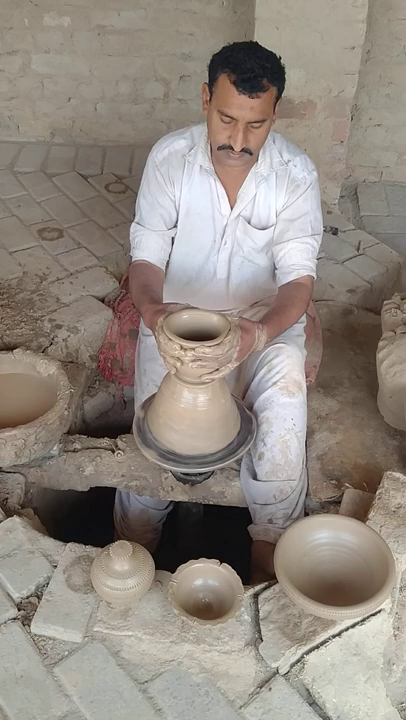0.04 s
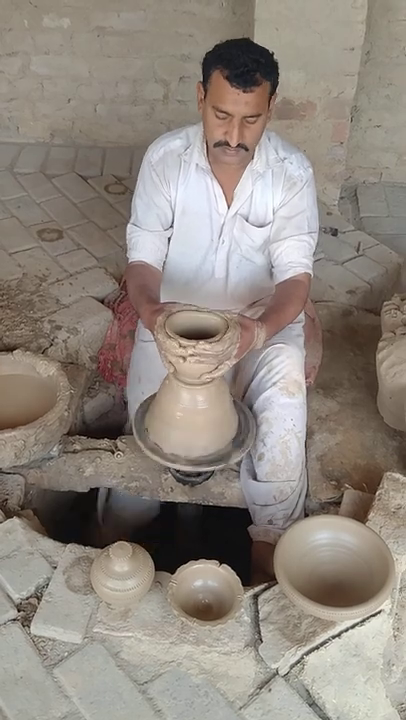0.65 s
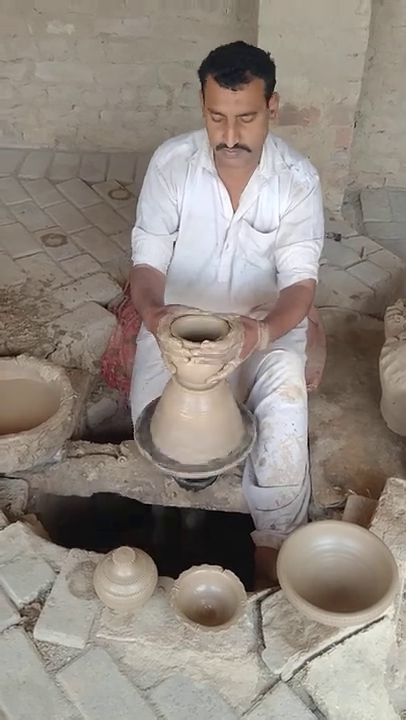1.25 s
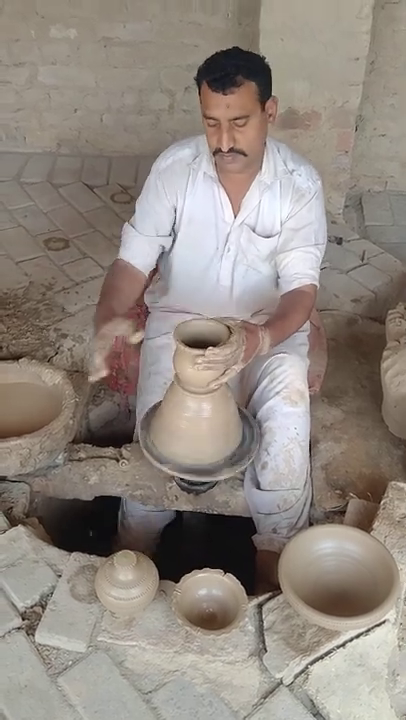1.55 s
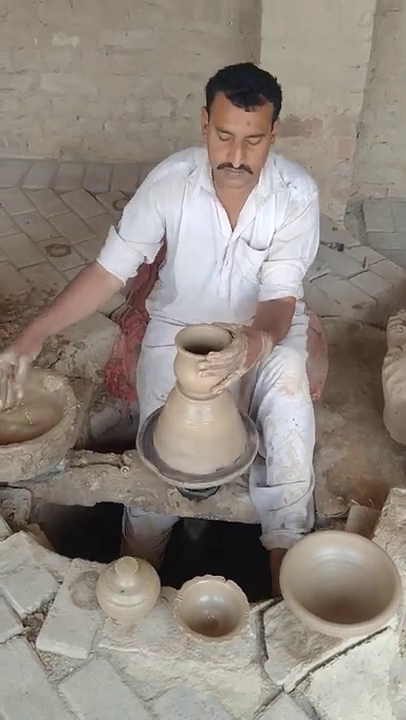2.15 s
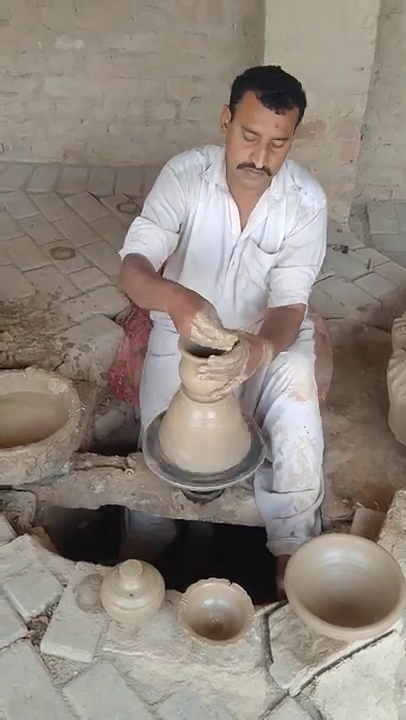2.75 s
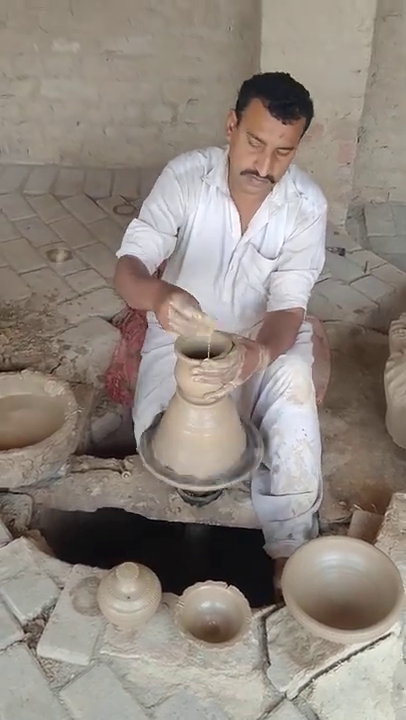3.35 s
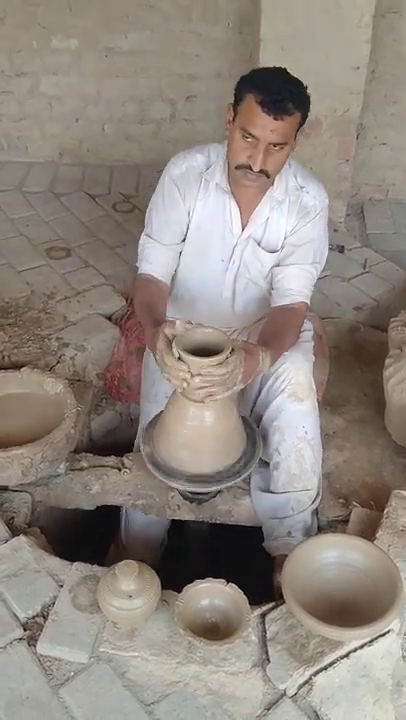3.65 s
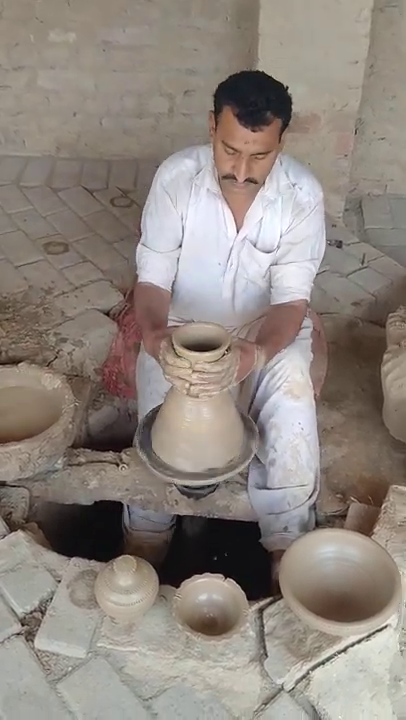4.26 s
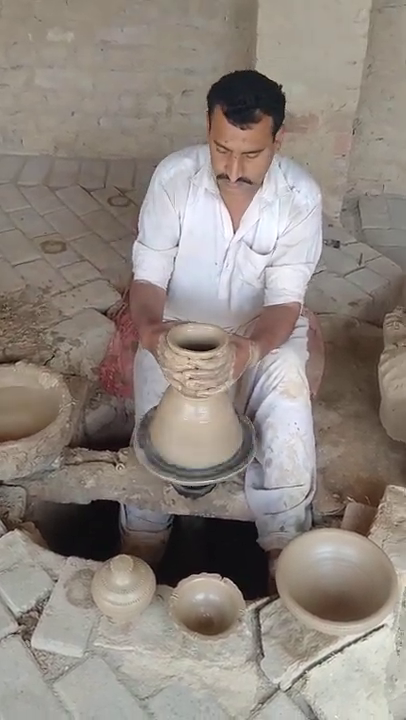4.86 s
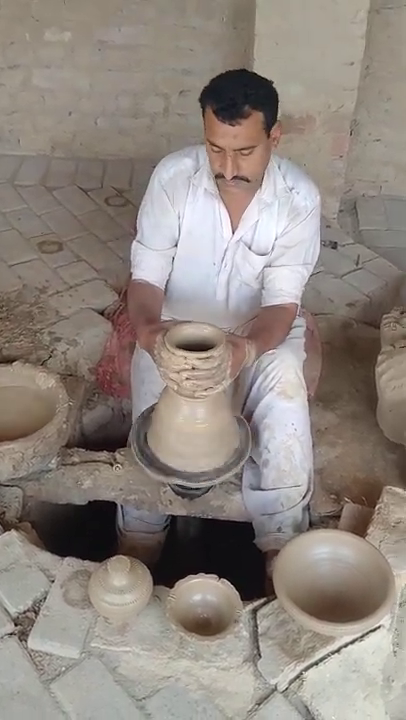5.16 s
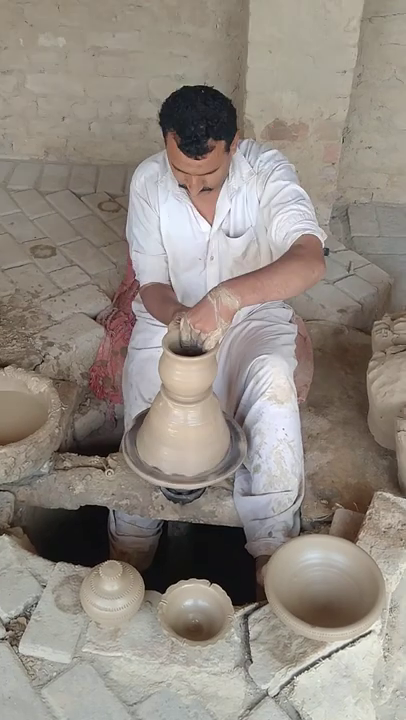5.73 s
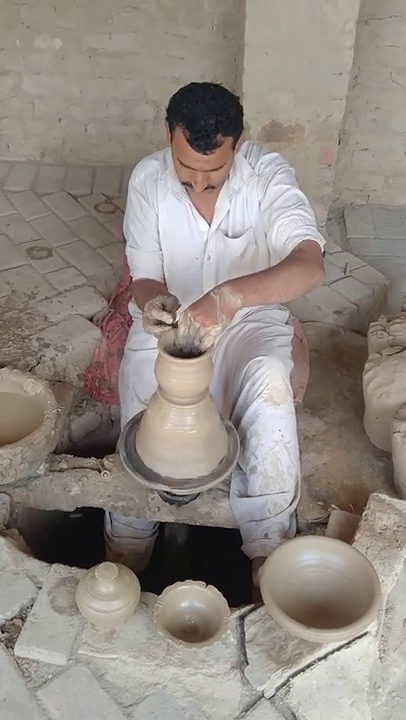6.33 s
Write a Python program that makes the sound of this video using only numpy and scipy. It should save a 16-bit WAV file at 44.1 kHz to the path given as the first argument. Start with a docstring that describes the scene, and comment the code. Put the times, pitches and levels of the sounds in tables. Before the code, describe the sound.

A potter's wheel rumbles, rattles and grinds under sharp woody knocks about once a second, then stops abruptly, leaving soft bumps and wet wipes.

```python
"""A sharp, woody knock rings round an open brick workshop and returns about once a second.
Before one microphone, a potter's kick wheel turns over a pit: its loose shaft clacks, and its worn
bearing rumbles, throbs, grinds and ticks, setting the frame moaning. Wet hands wipe the clay; far off
a bird chirps faintly. The wheel's noise stops abruptly, leaving a few soft bumps, knocks and wipes
in the quiet yard."""
import sys
import numpy as np
from scipy import signal
from scipy.fft import rfft, irfft, next_fast_len
from scipy.io import wavfile

SR = 44100
rng = np.random.default_rng(int(sys.argv[2]) if len(sys.argv) > 2 else 0)


def transcribe(u):
    """Save the signal u as a 16-bit wav file named by the first command-line argument.

    u: samples, shape (n,) or (channels, n), limited to [-1, 1]; the rate is SR.
    q: integer samples, one column per channel.
    """
    v = np.clip(np.atleast_2d(u).T, -1, 1)
    q = np.round(v * 32767).astype(np.int16)
    wavfile.write(sys.argv[1], SR, q)


N = 290619
TIME = np.arange(N) / SR

# Pace of the wheel: t/s, throb rate/Hz
THROB_RATE = [(0.0, 14.47), (0.65, 27.3), (0.88, 19.98), (1.35, 30.13), (1.68, 13.02), (1.95, 23.21),
              (2.28, 25.36), (2.5, 18.37), (3.0, 16.24), (3.8, 15.65), (4.3, 16.63), (4.95, 13.69),
              (5.6, 15.81)]
# Drag of the bearing, swelling and easing about once a second: t/s, relative level/dB
BEARING_DRAG = [(0, -22), (.2, -22.5), (.6, -15), (1.0, -13.5), (1.22, -6), (1.58, -14.5), (2.0, -3),
                (2.28, 1.5), (2.55, -8), (2.85, -12.5), (3.15, -13), (3.42, -3), (3.53, -0.5), (3.9, -4),
                (4.25, -11), (4.95, -10.5), (5.38, -8), (5.55, -8.5)]
STOP_S = 5.572
def wheel():
    """Foreground: uneven rotation and bearing drag drive the wheel's noises until they cut off."""
    cycles = np.cumsum(follow(THROB_RATE) * np.exp(.01 * drift(12))) / SR
    throb = np.cos(2 * np.pi * cycles)
    drag_db = follow(BEARING_DRAG)
    # worn spots in the bearing jolt the shaft
    blows = unit(jolts(cycles, spread_db=0) + 2.3 * jolts(3 * cycles + .15 * drift(30), spread_db=3))
    rolling = rng.standard_normal(N) * amp(2.1 * throb)
    out = pit_rumble(blows, rolling, throb) + frame_growl(blows, throb, drag_db)
    # the loose shaft chatters about three times a throb, with one more jolt on top
    chatter = jolts(3 * cycles + .3 * drift(60), spread_db=-1.5)
    chatter = unit(chatter + .67 * jolts(cycles + .1489, spread_db=-2))
    out += collar_rattle(chatter, rolling) + frame_hum(chatter, rolling, throb)
    out += bearing_grind(throb, drag_db) + hiss_and_fizz(cycles, drag_db) + ball_ticks()
    out += shaft_clacks() + frame_moans()
    return out * (TIME < STOP_S)


# Spectrum down in the pit: f/Hz, level/dB
PIT_COLOUR = [(30, -82), (50, -33), (65, -19.5), (85, -6.5), (105, 3.5), (125, 4.5), (145, 3), (175, 3),
              (215, -7.5), (300, -23), (450, -75), (2000, -100)]
# Course of the rumble: t/s, level/dB
RUMBLE_LEVEL = [(0, -27.5), (0.18, -32.5), (0.45, -19.5), (0.72, -24.5), (1.02, -21.5), (1.3, -22),
                (1.7, -32), (1.95, -26.5), (2.15, -21), (2.3, -25.5), (2.38, -29), (2.62, -26),
                (2.82, -32.5), (3.35, -26), (3.55, -28), (3.7, -23.5), (4.1, -28.5), (4.22, -27.5),
                (4.75, -26), (5.25, -31.5), (5.55, -26)]
# The pit's air booms up: middle t/s, length/s, f/Hz, level/dB
PIT_BOOMS = [(0.55, 0.25, 162, -29), (2.19, 0.26, 127, -22), (2.702, 0.13, 111, -20.5),
             (3.676, 0.094, 128, -20), (3.941, 0.051, 124.6, -24.5), (4.084, 0.11, 129.3, -21.5)]
def pit_rumble(blows, rolling, throb):
    """Under the wheel, the jolted shaft rumbles and the air in the pit resonates."""
    air = ring(rng.standard_normal(N), [(125.4, 7, 0)])
    boom = amp(-4.5 + 1.5 * throb) * steady(colour(air, PIT_COLOUR), span_s=.6)
    shaft = colour(blows + .76 * rolling, PIT_COLOUR)
    rumble = amp(follow(RUMBLE_LEVEL) + .66 * drift(21)) * steady(shaft + boom, span_s=.2)
    return rumble + tones(colour(rolling, PIT_COLOUR), PIT_BOOMS, width_hz=5)


# Resonances of the frame: f/Hz, width/Hz, level/dB
FRAME_RESONANCES = [(252.2, 6.2, 2), (349.4, 16, 1.5), (418.3, 46, 1.5), (491, 99, -2.5)]
# How well the frame radiates: f/Hz, level/dB
FRAME_RADIATION = [(40, -50), (120, -41), (260, 1.5), (550, 0), (1200, -19.5), (6000, -63.5)]
def frame_growl(blows, throb, drag_db):
    """Jolts and grit shake the frame, harder as the bearing drags."""
    frame = ring(.5 * blows + grit(400, spread_db=2) * amp(1.2 * throb), FRAME_RESONANCES)
    growl = steady(colour(frame, FRAME_RADIATION), span_s=.23)
    return amp(-33.5 + .97 * drag_db + 1.7 * throb) * growl


# Moans as the hands brake the wheel: middle t/s, f/Hz, level/dB
MOANS = [(0.623, 430, -34), (0.665, 430, -27), (0.705, 437, -29), (0.747, 434, -27.5), (0.787, 419, -27.5),
         (0.814, 432, -25), (0.865, 425, -29.5), (1.3, 467, -25), (1.39, 480, -30), (1.435, 457, -41),
         (1.47, 470, -32), (1.864, 408, -28.5), (1.91, 405, -35.5), (2.004, 400, -26.5), (2.045, 410, -26),
         (2.087, 420, -31.0), (2.126, 417, -26), (2.165, 376, -27), (2.205, 398, -25), (2.245, 380, -26),
         (2.285, 400, -34), (2.325, 400, -21.5), (2.369, 419, -25.5), (2.395, 428, -28.0),
         (3.054, 450, -32.5), (3.11, 412, -29), (3.229, 406, -37.5), (3.289, 394, -35), (3.345, 430, -36),
         (3.42, 408, -23.5), (3.599, 406, -34), (3.671, 420, -27), (3.736, 447, -45), (3.796, 420, -31.5),
         (3.864, 409, -53), (3.925, 404, -37), (4.048, 390, -38), (4.175, 377, -39), (4.231, 380, -38),
         (4.29, 414, -39), (4.411, 390, -47), (4.54, 430, -36), (4.675, 400, -44), (4.875, 417, -49),
         (4.95, 424, -39), (5.026, 437, -36.0), (5.101, 455, -35), (5.166, 450, -35.5), (5.235, 440, -34),
         (5.303, 448, -34.0), (5.36, 410, -33), (5.431, 430, -31.0), (5.503, 420, -29), (5.566, 409, -33.5)]
def frame_moans():
    """In separate throbs the frame swells up on a slightly different note and dies away."""
    out, t = np.zeros(N), np.arange(-SR // 10, SR // 10) / SR
    for s, hz, db in MOANS:
        length = .58 / np.interp(s, *np.transpose(THROB_RATE))  # just over half a throb
        note = ring(rng.standard_normal(len(t)), [(hz, 41, 0)])
        note = colour(note, [(hz / 2, -24), (hz, 0), (hz * 2, -30)])
        add(out, s + t[0], amp(db) * np.exp(-(2 * t / length) ** 2) * steady(note, span_s=.015))
    return out


# Held notes of the frame: middle t/s, length/s, f/Hz, level/dB
FRAME_HUMS = [(1.36, 0.38, 481, -35), (2.18, 0.6, 357.6, -33), (3.412, 0.17, 250, -37.5),
              (4.393, 0.9, 346.4, -41.5), (5.3, 0.98, 252, -45.5)]
def frame_hum(chatter, rolling, throb):
    """Narrow resonances of the frame hum on under the throbs."""
    drive = colour(chatter + 1.4 * rolling, FRAME_RADIATION)
    return tones(drive, FRAME_HUMS, width_hz=6.1) * amp(.48 * throb)


# The shaft hits its collar as the wheel is driven: t/s, relative level/dB
SHAFT_HITS = [(.2842, -39), (.3346, -37), (.3815, -33), (.424, -33), (.4668, -33), (.5077, -31),
              (.5466, -34), (.587, -34), (.6264, -32), (.6633, -30), (.7007, -31.5), (.7387, -33),
              (.7826, -36), (.829, -29.5), (.8783, -33), (.9262, -29), (.9726, -27.5), (1.017, -27.5),
              (1.0594, -25.5), (1.1003, -29.5), (1.1398, -26.5), (1.2141, -30), (1.25, -28), (1.2859, -32),
              (1.32, -32), (1.3538, -33), (1.386, -33), (1.421, -36)]
# Ring of each hit: f/Hz, width/Hz, level/dB
CLACK_RESONANCES = [(417, 83, 5.5), (530, 90, -5), (690, 70, -4.5), (794, 54, 3), (886, 68, -13)]
# Spectrum of its scuff: f/Hz, level/dB
SCUFF_COLOUR = [(150, -13), (400, 6.5), (600, -5.5), (800, 2), (950, -7.5), (1150, -19), (1800, -34),
                (3500, -53)]
def shaft_clacks():
    """Hollow clacks at the collar: each blow rings the same few modes, with a brief dull scuff."""
    blows = np.zeros(N)
    for s, db in SHAFT_HITS:
        add(blows, s, amp([db]))
    friction = steady(colour(rng.standard_normal(N), SCUFF_COLOUR), span_s=.0044)
    scuffs = taps(SHAFT_HITS, hold_s=.009, decay_s=.004) * friction
    clacks = amp(-6) * scuffs.std() * ring(blows, CLACK_RESONANCES) + amp(-4) * scuffs
    return signal.sosfilt(signal.butter(4, 1900, fs=SR, output="sos"), clacks)


# Resonances of the shaft: f/Hz, width/Hz, level/dB
SHAFT_RESONANCES = [(171, 25.6, 9.5), (443.3, 11.5, 9.5), (494, 67, 2), (700, 25, -6.5), (789, 63, -8)]
# How well the shaft radiates: f/Hz, level/dB
SHAFT_RADIATION = [(40, -74), (110, -11), (170, -6), (500, -1), (700, -1.5), (1000, -3), (2000, -19),
                   (6000, -57)]
# Rattle while the clay is pressed hard: middle t/s, length/s, level/dB
CLAY_PRESSES = [(0.43, 0.25, -30.5), (0.672, 0.26, -28.5), (1.166, 0.6, -26), (3.56, 0.23, -30.5),
                (5.1, 1, -52)]
def collar_rattle(chatter, rolling):
    """The loose shaft rattles and shakes the frame, loudly under a press and faintly in between."""
    pressed = sum(amp(db) * swell(s, length) for s, length, db in CLAY_PRESSES)
    shaft = colour(ring(chatter + .37 * rolling, SHAFT_RESONANCES), SHAFT_RADIATION)
    frame = colour(ring(chatter, FRAME_RESONANCES), FRAME_RADIATION)
    return np.hypot(pressed, amp(-49.5)) * steady(shaft + amp(-2.5) * frame, span_s=.089)


# Spectrum of the grinding: f/Hz, level/dB
GRIND_COLOUR = [(60, -44), (250, 11.5), (500, -3), (900, 1.5), (1300, 0.5), (1600, -2.5), (1950, 2),
                (2350, -2.5), (2650, -8), (3600, -16), (4400, -23.5), (8000, -33), (12000, -69.5)]
# Resonances of the bearing: f/Hz, width/Hz, level/dB
BEARING_RESONANCES = [(2142, 88, 0), (2340, 29, -11), (2300, 40, -33), (3340, 90, -20.5), (3693, 89, -12.5),
                      (5140, 81, -16), (6040, 65, -17), (7500, 100, -14.5), (10400, 200, -31.5)]
# Brief metallic swells of the race: middle t/s, length/s, f/Hz, level/dB
RACE_RINGS = [(1.732, 0.078, 2160, -48), (1.907, 0.093, 2110, -40), (2.136, 0.08, 2145, -36),
              (2.4, 0.059, 2105, -36), (2.794, 0.15, 2250, -50.5), (3.543, 0.44, 3400, -51),
              (3.69, 0.57, 2140, -43.5), (4.18, 0.18, 2140, -43.5), (4.376, 0.15, 2110, -50)]
def bearing_grind(throb, drag_db):
    """Grit in the race grinds and makes the metal sing as the bearing drags."""
    scrape = grit(2500, spread_db=-2.5) + .73 * rng.standard_normal(N)
    scrape *= amp(.14 * throb + drift(77))
    grind = amp(-30.5 + drag_db) * colour(scrape, GRIND_COLOUR)
    singing_db = -43 + .96 * drag_db + 2 * drift(8.2)
    singing = amp(singing_db) * ring(grit(2500, spread_db=2.5), BEARING_RESONANCES)
    return grind + singing + tones(scrape, RACE_RINGS, width_hz=22)


# Spectra of the bearing's hiss and the clay's fizz: f/Hz, level/dB
BEARING_HISS = [(2000, 0.5), (3500, 2.5), (4600, -7.5), (6200, -1), (7600, -0.5), (8400, -4.5), (9600, -14),
                (11500, -17), (15700, -10.5)]
CLAY_FIZZ = [(5000, -38), (9000, -18), (11500, -24), (13500, -18), (15700, -9)]
def hiss_and_fizz(cycles, drag_db):
    """The bearing hisses and wet clay fizzes under the hands; both rise with the drag."""
    surge_db = 8.5 * swell(s=2.14, length=.99)  # once, as the wheel speeds up
    hiss_db = -49.5 + .77 * drag_db + surge_db + 1.15 * np.cos(4 * np.pi * cycles)
    hiss = amp(hiss_db) * colour(rng.standard_normal(N) * amp(2.5 * drift(98)), BEARING_HISS)
    fizz = amp(-53.5 + .84 * drag_db + .9 * drift(8)) * colour(rng.standard_normal(N), CLAY_FIZZ)
    return room(hiss + fizz, wet_db=-4)


# Slips of the bearing balls: t/s, level/dB
BALL_SLIPS = [(1.2499, -42), (1.2713, -44), (1.296, -44), (1.3202, -48), (1.3726, -50), (1.402, -54),
              (1.435, -52), (1.4689, -55), (1.5103, -53), (1.5327, -48), (1.5542, -47), (1.5771, -50),
              (1.6016, -47.5), (1.634, -63), (1.6694, -51), (1.6894, -50), (1.718, -55), (1.7448, -57),
              (1.7732, -53), (1.8, -57), (1.8276, -44), (1.845, -46), (1.8615, -42), (1.8944, -42),
              (1.915, -44), (1.955, -44), (5.228, -64), (5.268, -59), (5.297, -58), (5.333, -57),
              (5.358, -54), (5.378, -58), (5.401, -58)]
# Their resonances: f/Hz, width/Hz, level/dB
BALL_RESONANCES = [(3570, 190, 6.5), (6400, 340, 2), (6800, 620, 1), (7500, 330, 9), (8150, 500, -25)]
# How well they radiate: f/Hz, level/dB
BALL_RADIATION = [(2000, -8), (3500, 3.5), (8200, -1.5), (10000, 0)]
def ball_ticks():
    """Each ball slips briefly at a worn spot, with a thin, well-damped ring."""
    slips = taps(BALL_SLIPS, hold_s=.005, decay_s=.002) * rng.standard_normal(N)
    return room(slips.std() * colour(ring(slips, BALL_RESONANCES), BALL_RADIATION), wet_db=-3)


# One thin squeak: middle t/s, length/s, f/Hz, level/dB
DRY_SQUEAK = (5.49, .11, 6200, -58)
def bearing_squeak():
    """The dry bearing whistles briefly, with an unsteady tone."""
    s, length, hz, db = DRY_SQUEAK
    whistle = ring(rng.standard_normal(N), [(hz, 90, 0)])
    return amp(db) * np.exp(-(2 * (TIME - s) / length) ** 4) * whistle


# Knocks in the workshop: t/s, level/dB, rise/s, tilt/(dB per octave),
# main ring f/Hz, its width/octaves, its boost/dB, hollow body/dB
WOOD_KNOCKS = [(.0098, -14.5, 0.0016, -0.1, 2720, 0.69, 14, 3.5),
               (1.179, -20, 0.00041, 1.3, 2920, 0.49, 9.5, 0.5),
               (2.319, -17.5, 0.0011, 0.5, 3120, 0.35, 17, 12),
               (3.444, -20.5, 0.0082, 0, 3000, 0.6, 9.5, -4),
               (4.532, -18.5, 0.0068, -1.05, 2180, 0.22, 7.5, 5),
               (5.863, -35, 0.014, -2, 2700, 0.55, 15, 7), (6.175, -38.5, 0.0017, 0, 3160, 0.19, 12, -4)]
# After-ring of the wood: f/Hz, width/Hz, level/dB
WOOD_RESONANCES = [(2840, 28, -10.5), (2890, 91, -1), (2900, 110, 8), (3420, 230, -13)]
# Hard contacts within the knocks, some striking twice: t/s, level/dB
CONTACTS = [(.0108, -17), (1.1792, -15.5), (2.3194, -19), (3.4495, -21), (3.4592, -17.5), (4.5333, -19),
            (4.5412, -18.5)]
# Their echoes, reaching the microphone off pit, floor and wall: delay/s, relative level/dB
FIRST_ECHOES = [(.0055, -12.5), (0.0139, -3), (0.021, -4)]
# Spectra of a knock's burst and of its crack: f/Hz, level/dB
BURST_COLOUR = [(30, -47), (80, -33.5), (200, 16), (400, 5.5), (800, -5.5), (1600, -0.5), (2200, -0.5),
                (3100, -9), (3700, -7.5), (4400, -9.5), (7400, -7), (8300, -16), (10500, -27), (13000, -24),
                (15700, -16)]
CRACK_COLOUR = [(300, 4), (1200, 5), (2200, 13.5), (3100, 8), (4300, -8), (7000, -7), (9000, -32),
                (11000, -29.5), (15700, -20.5)]
def knocks(burst_decay_s=.025, crack_decay_s=.001):
    """Hard, woody claps: a crack, a ragged burst and a short ring, then the walls answer."""
    out, t = np.zeros(N), np.arange(SR // 4) / SR
    hz = np.fft.rfftfreq(len(t), 1 / SR) + 1
    for s, db, rise_s, tilt_db, ring_hz, ring_octaves, ring_db, body_db in WOOD_KNOCKS:
        shape_db = read(BURST_COLOUR, hz) + tilt_db * np.log2(hz / 2000)
        shape_db += ring_db * np.exp(-(np.log2(hz / ring_hz) / ring_octaves) ** 2)
        shape_db += body_db * np.exp(-(np.log2(hz / 1000) / .52) ** 2)
        burst = unit(irfft(rfft(rng.standard_normal(len(t))) * amp(shape_db), len(t)))
        blow = burst * np.minimum(t / rise_s, 1) * np.exp(-np.maximum(t - rise_s, 0) / burst_decay_s)
        after_ring = amp(-12) * blow.std() * ring(blow, WOOD_RESONANCES)
        add(out, s, amp(db) * (blow + after_ring))
    for s, db in CONTACTS:
        for delay_s, echo_db in [(0, 0)] + FIRST_ECHOES:
            crack = steady(colour(rng.standard_normal(len(t)), CRACK_COLOUR), span_s=.002)
            add(out, s + delay_s, amp(db + echo_db) * np.exp(-t / crack_decay_s) * crack)
    return room(out, wet_db=-6)


# Bumps at the wheel: t/s, relative level/dB
WHEEL_BUMPS = [(4.532, -27), (5.867, -23), (5.895, -30), (5.929, -34), (6.006, -31), (6.145, -26),
               (6.179, -21.5), (6.497, -37)]
def bumps():
    """Soft low bumps, each with a brief hollow ring."""
    out, t = np.zeros(N), np.arange(SR // 6) / SR
    envelope = (1 - np.exp(-t / .0029)) * np.exp(-t / .0085)
    for s, db in WHEEL_BUMPS:
        hz = 205 * np.exp(.034 * rng.standard_normal())
        add(out, s, amp(db) * envelope * np.sin(2 * np.pi * hz * t))
    return out


# Hands on the clay, and a brief bright fizz on the faint knock at 5.86 s: middle t/s, length/s, level/dB, share
# of dull rubbing/0-1
HAND_WIPES = [(0.395, 0.057, -45, 0.43), (0.702, 0.2, -44, 0.53), (1.033, 0.0059, -34, 0.6),
              (3.257, 0.015, -33, 0.7), (3.397, 0.37, -47.5, 0.13), (4.326, .09, -52, 0.1),
              (5.873, 0.015, -36, 0.12), (6.084, 0.11, -52, 0.7), (6.235, 0.11, -44, 0.05),
              (6.327, 0.08, -46.5, 0.96), (6.384, 0.13, -52, 0.03), (6.531, 0.022, -51.5, 1)]
# Spectra of wet and of drier skin: f/Hz, level/dB
WET_SKIN = [(500, 2), (1500, 2), (3000, 2.5), (4300, 1), (6500, 2.5), (7700, 2), (10500, -11),
            (13000, -5.5), (15700, 7)]
DRY_SKIN = [(300, -4), (900, -4.5), (1500, 1.5), (2300, -9.5), (3200, -10.5), (6000, -32), (12000, -52)]
def wipes():
    """On top of the wheel, wet fingers slide with a fine fizz; drier skin gives a dull rub."""
    wet = colour(grit(9000, spread_db=0), WET_SKIN)
    dull = colour(grit(2000, spread_db=1.5), DRY_SKIN)
    out = np.zeros(N)
    for s, length, db, share in HAND_WIPES:
        out += amp(db) * swell(s, length) * (np.sqrt(share) * dull + (1 - share) * wet)
    return room(out, wet_db=-6.5)


# A bird far from the microphone: t/s, length/s, start f/Hz, held f/Hz, end f/Hz, level/dB
BIRD_CHIRPS = [(1.095, 0.046, 6400, 5020, 2960, -48), (1.233, 0.068, 5400, 4280, 2970, -37),
               (4.987, 0.037, 6000, 4840, 2680, -48), (5.117, 0.065, 5100, 4150, 3300, -38)]
def bird(rasp_depth=.125, ends_db=-15):
    """Raspy chirps drop, linger loudest on one note and drop again, smeared by the walls."""
    out, rasp = np.zeros(N), drift(1040)
    for s, length, start_hz, held_hz, end_hz, db in BIRD_CHIRPS:
        u = np.linspace(-1, 1, int(length * SR))  # 0 at the held note
        hz = held_hz + (np.where(u < 0, start_hz, end_hz) - held_hz) * u ** 2
        hz *= 1 + rasp_depth * rasp[int(s * SR):][:len(u)]
        envelope = amp(db + ends_db * abs(u)) * signal.windows.tukey(len(u), .2)
        add(out, s, envelope * np.sin(2 * np.pi * np.cumsum(hz) / SR))
    return room(out, wet_db=-2)


# Spectrum of the yard outside: f/Hz, level/dB
YARD_AIR = [(30, -66), (48, -38), (62, -16), (90, -12.5), (115, 3.5), (150, -15), (200, -4), (260, -9),
            (330, -17), (480, -20.5), (700, -24.5), (1500, -25), (2700, -33), (4000, -50.5), (15500, -64.5)]
def yard():
    """Dull, gently wavering outdoor air behind everything."""
    return amp(-42 + drift(30)) * colour(rng.standard_normal(N), YARD_AIR)


# Reverberation of the workshop: f/Hz, time to fall 60 dB/s
WORKSHOP_DECAY = [(150, 0.61), (1000, 0.27), (2500, 0.056), (6000, 0.14), (15000, 0.21)]
def room(x, wet_db):
    """Adds the short, dense echo of brick walls and roof."""
    hz, t, noise = signal.stft(rng.standard_normal(SR // 2), SR, nperseg=256)
    tail = signal.istft(noise * amp(-60 * t / read(WORKSHOP_DECAY, hz)[:, None]), SR, nperseg=256)[1]
    tail[:int(.003 * SR)] = 0
    return x + amp(wet_db) * signal.oaconvolve(x, tail / np.linalg.norm(tail))[:N]


def amp(db):
    return 10 ** (np.asarray(db) / 20)


def unit(x):
    return x / np.sqrt(np.mean(x ** 2) + 1e-20)


def follow(rows):
    """A curve table at every sample."""
    return np.interp(TIME, *np.transpose(rows))


def read(points, hz):
    """A spectrum table on a log-frequency axis."""
    f, value = np.transpose(points)
    return np.interp(np.log(hz + 1), np.log(f + 1), value)


def add(mix, s, sound):
    """Mixes a sound in at second s."""
    part = mix[max(round(s * SR), 0):][:len(sound)]
    part += sound[:len(part)]


def colour(x, points):
    """Gives x a spectrum, at rms 1."""
    size = next_fast_len(len(x) + 8192)
    gain = amp(read(points, np.fft.rfftfreq(size, 1 / SR)))
    return unit(irfft(rfft(x, size) * gain, size)[:len(x)])


def ring(x, modes):
    """Drives a set of damped resonances, at rms 1."""
    t = np.arange(SR // 8) / SR
    body = sum((-1) ** k * amp(db) * width * np.exp(-np.pi * width * t) * np.cos(2 * np.pi * hz * t)
               for k, (hz, width, db) in enumerate(modes))
    return unit(signal.oaconvolve(x, body)[:len(x)])


def drift(per_s):
    """A smooth random wander of rms 1."""
    size = next_fast_len(N, real=True)
    hz = np.fft.rfftfreq(size, 1 / SR)
    lowpass = np.exp(-np.minimum(hz / per_s, 10) ** 2)
    return unit(irfft(rfft(rng.standard_normal(size)) * lowpass, size)[:N])


def steady(x, span_s):
    """Evens out swells slower than the span."""
    window = signal.windows.hann(int(span_s * SR) + 3)
    return x / np.sqrt(abs(signal.fftconvolve(x ** 2, window / window.sum(), "same")) + 1e-6)


def jolts(cycles, spread_db):
    """One impulse at each whole cycle, its size scattered by the spread."""
    return np.diff(np.floor(cycles), prepend=0) * amp(spread_db * np.clip(rng.standard_normal(N), -2, 2))


def grit(per_s, spread_db):
    """Random tiny impacts, at rms 1."""
    impacts = (rng.random(N) < per_s / SR) * rng.choice([-1, 1], N)
    return unit(impacts * amp(spread_db * np.minimum(rng.exponential(1, N), 4)))


def swell(s, length):
    """A smooth rise and fall around the moment s, with its top at 1."""
    return np.exp(-np.minimum(2 * abs(TIME - s) / length, 10) ** 2)


def tones(drive, rows, width_hz):
    """Each row lets one resonance swell up and fade."""
    return sum(amp(db) * swell(s, length) * steady(ring(drive, [(hz, width_hz, 0)]), span_s=.084)
               for s, length, hz, db in rows)


def taps(rows, hold_s, decay_s):
    """The envelope of brief contacts: each starts at once, holds and dies away."""
    out, t = np.zeros(N), np.arange(SR // 10) / SR
    for s, db in rows:
        add(out, s, amp(db) * np.exp(-np.maximum(t - hold_s, 0) / decay_s))
    return out


def scene():
    """Workshop in front, bird and yard behind, in mono."""
    return (wheel() + bearing_squeak() + knocks() + wipes() + bumps() + bird() + yard())[None]


def record(dry, low_hz=62, high_hz=15850):
    """The small microphone sheds the deepest bass; the recorder cuts the highest treble."""
    lean = signal.sosfilt(signal.butter(3, low_hz, "highpass", fs=SR, output="sos"), dry)
    band_limit = signal.firwin(511, high_hz, window=("kaiser", 9), fs=SR)
    return signal.oaconvolve(lean, band_limit[None], "same", axes=1)


dry = scene()
out = record(dry)
transcribe(out)
```